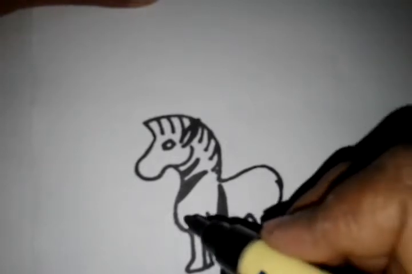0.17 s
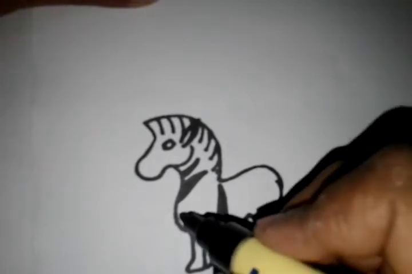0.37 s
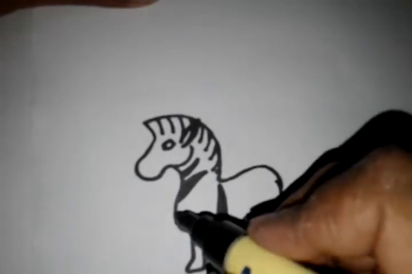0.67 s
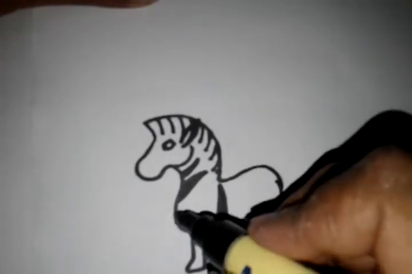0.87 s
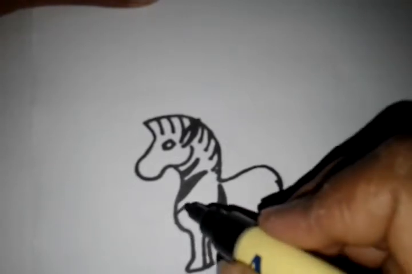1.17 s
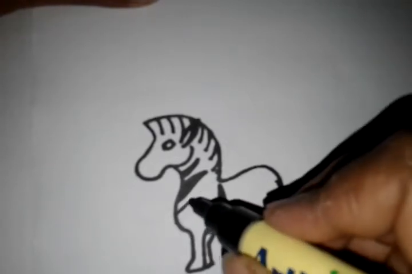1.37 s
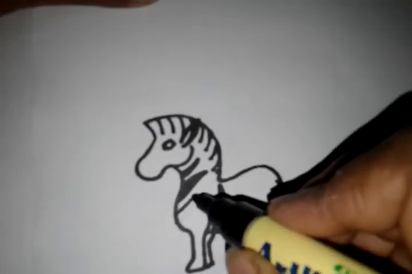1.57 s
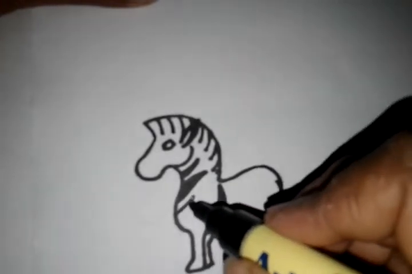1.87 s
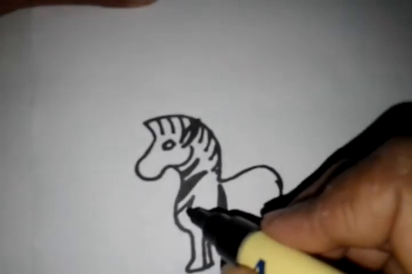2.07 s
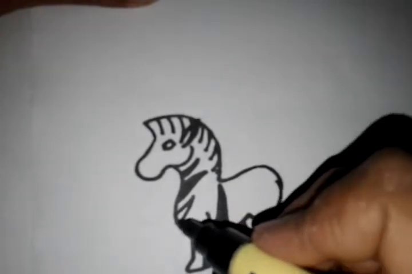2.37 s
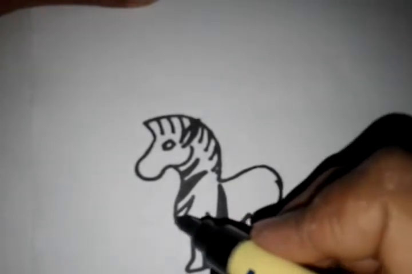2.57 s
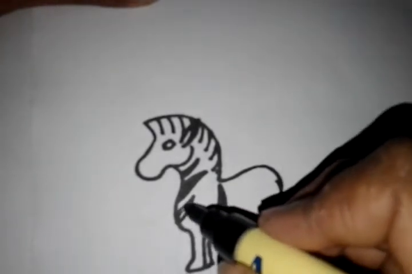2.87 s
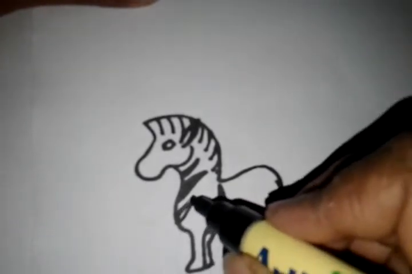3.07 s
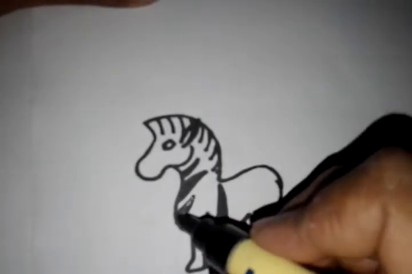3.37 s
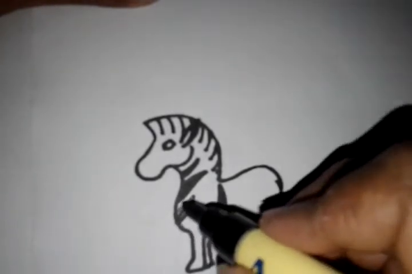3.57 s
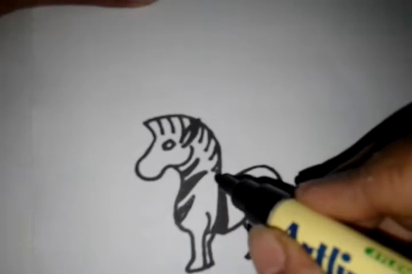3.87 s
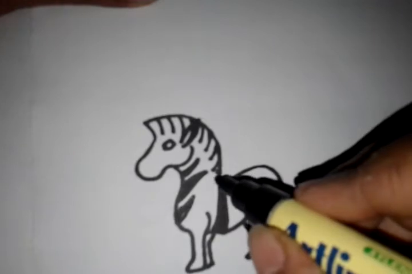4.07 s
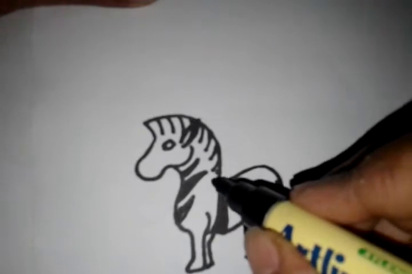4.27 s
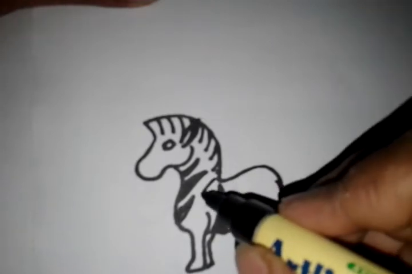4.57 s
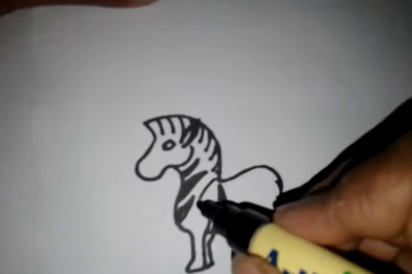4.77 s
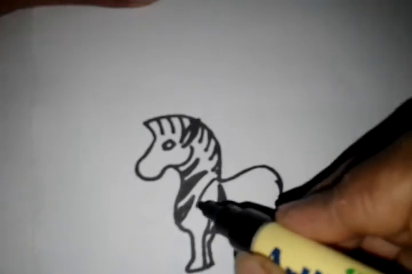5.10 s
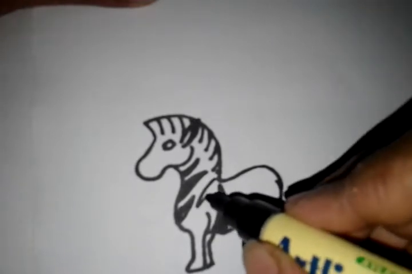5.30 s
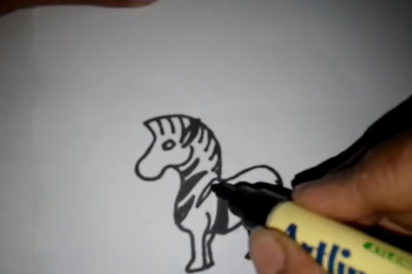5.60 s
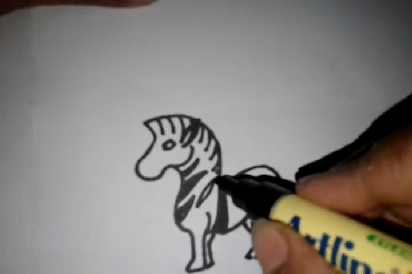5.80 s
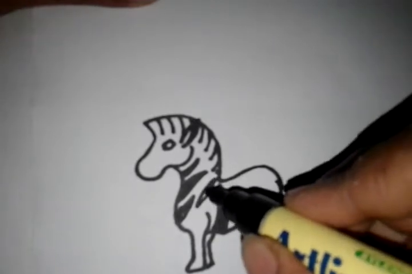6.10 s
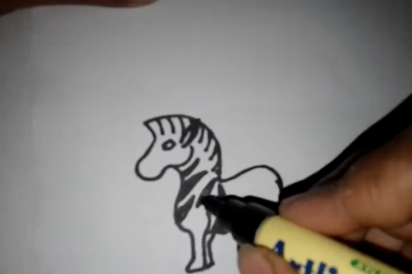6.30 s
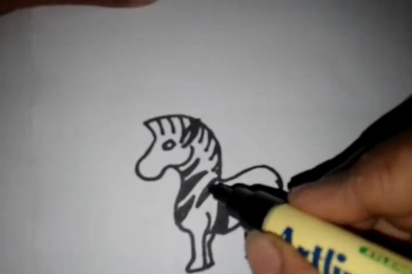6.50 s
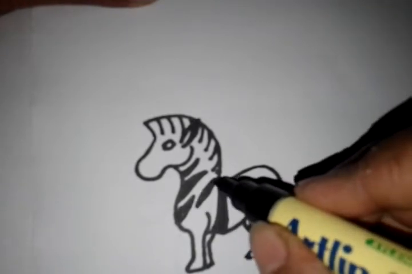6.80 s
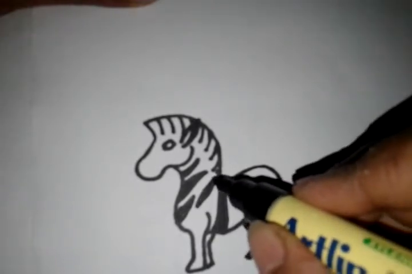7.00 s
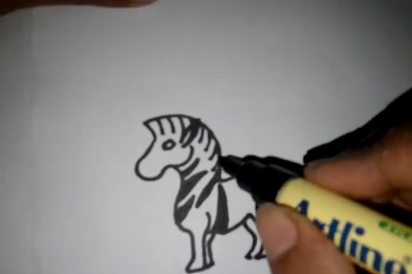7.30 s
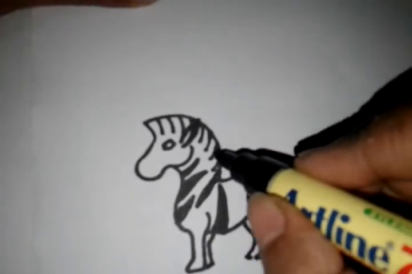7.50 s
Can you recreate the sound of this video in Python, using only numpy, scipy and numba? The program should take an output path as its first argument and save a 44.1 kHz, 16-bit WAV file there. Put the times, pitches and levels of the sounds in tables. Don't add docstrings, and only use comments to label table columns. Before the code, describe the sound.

Close dry marker strokes rasp and click on a sheet of paper, with short pauses, faint hand rustle, soft desk thuds and distant traffic.

```python
import sys
import numpy as np
from scipy import signal
from scipy.fft import rfft, irfft, next_fast_len
from scipy.io import wavfile
from numba import njit

SR = 44100
rng = np.random.default_rng(int(sys.argv[2]) if len(sys.argv) > 2 else 0)


def materialize(psi):
    bounded = np.clip(np.atleast_2d(psi).T, -1, 1)
    quanta = np.round(bounded * 32767).astype(np.int16)
    wavfile.write(sys.argv[1], SR, quanta)


def invert_db(x):
    u = np.asarray(x, float) / 20
    return 10 ** u


N = 337363
T = np.arange(N) / SR
NIB_TOP_HZ = 7800


def level(x, db):
    return x * invert_db(db) / np.sqrt(np.mean(x ** 2))


def walk(rate):
    knots = rng.standard_normal(4000)
    return 1.2 * np.interp(T * rate, np.arange(len(knots)), knots)


def over_time(rows):
    return np.interp(T, *np.transpose(rows))


def swell_between(start_s, end_s, ramp_s):
    return np.clip(np.minimum(T - start_s, end_s - T) / ramp_s, 0, 1)


def coloured(points):
    hz, db = np.transpose(points)
    size = next_fast_len(N)
    f = np.arange(size // 2 + 1) * SR / size + 1
    gain = invert_db(np.interp(np.log(f), np.log(hz), db))
    return level(irfft(rfft(rng.standard_normal(size)) * gain, size)[:N], 0)


@njit
def resonator(x, g, stretch, damping):
    y, band, low = np.empty(len(x)), 0., 0.
    for i in range(len(x)):
        h = g * stretch[i]
        v = (band + h * (x[i] - low)) / (1 + h * (h + damping))
        band, low = 2 * v - band, low + 2 * h * v
        y[i] = damping * v
    return y


def ring(x, modes, grip=np.ones(N), waver_db=0):
    out = 0
    for hz, width_hz, db, polarity in modes:
        g, damping = np.tan(np.pi * hz / SR), width_hz / hz
        stretch = 1 + (grip - 1) * (hz / NIB_TOP_HZ) ** 0.62
        waver = 1 + waver_db * np.log(10) / 20 * walk(7) if waver_db else 1
        once = resonator(x, g, stretch, damping)
        out = out + polarity * invert_db(db) * waver * resonator(once, g, stretch, damping)
    return out


# (fastest moment [s], scratch level [dB], rise [s], fall [s])
NIB_SWEEPS = [(.94, -37, 0.018, 0.083), (1.086, -40, 0.014, 0.012), (1.138, -36.5, 0.058, 0.046),
              (1.26, -44.5, 0.032, 0.027), (1.346, -38, 0.11, 0.048), (1.448, -35, 0.004, 0.019),
              (1.548, -39.5, 0.1, 0.032), (1.761, -32.5, 0.021, 0.093), (1.89, -37, 0.029, .08),
              (1.962, -41, .07, 0.042), (2.045, -39, .02, 0.21), (2.13, -44, 0.075, 0.027),
              (2.244, -37.5, 0.086, .06), (2.362, -38.5, 0.07, 0.056), (2.415, -42.5, 0.074, 0.015),
              (2.54, -38, 0.032, 0.058), (2.67, -52, 0.044, .05), (2.745, -33.5, 0.014, .05),
              (2.796, -28.5, 0.04, 0.083), (2.9, -29, 0.037, .09), (3.027, -38, 0.043, 0.031),
              (3.148, -33, 0.0076, .05), (3.208, -31.5, 0.044, 0.1), (3.292, -31, 0.14, 0.046),
              (3.44, -40, 0.016, 0.045), (3.558, -34.5, 0.11, 0.019),
              (4.18, -45.5, .005, 0.078), (4.264, -36.5, .03, 0.024), (4.392, -35.5, 0.084, 0.061),
                   (4.46, -31, 0.076, 0.044), (4.572, -36, 0.044, 0.16), (4.694, -36, 0.13, 0.019),
                   (4.792, -36, 0.083, .02), (4.894, -41.5, 0.088, 0.017), (5.106, -34, 0.032, .07),
                   (5.205, -37, 0.02, 0.25), (5.345, -32, 0.17, .05), (5.4, -42, .04, 0.083),
                   (5.448, -36, 0.0055, 0.02), (5.487, -34.5, 0.014, 0.066), (5.55, -35, 0.056, 0.051),
                   (5.654, -22.5, 0.0085, 0.009), (5.68, -27, 0.0082, 0.034), (5.703, -29.5, .004, .02),
                   (5.735, -34.5, .03, 0.026), (5.806, -36.5, 0.04, .016),
              (5.924, -33.5, 0.012, 0.011), (6.034, -34.5, .12, .1), (6.142, -31, 0.13, .06),
                  (6.19, -32.5, 0.045, 0.049), (6.374, -28, .009, 0.029), (6.426, -25, 0.048, 0.047),
                  (6.5, -34, 0.055, 0.15), (6.588, -40.5, 0.065, 0.026), (6.66, -42.5, .07, .05),
                  (6.788, -42, .005, 0.16), (6.88, -36.5, 0.02, 0.063), (7.02, -30.5, 0.018, .07),
                  (7.086, -30.5, 0.082, 0.03)]
# (time [s], top nib mode [Hz], sheet level [dB], barrel level [dB])
GRIP = [(.95, 7950, 3, -0.7), (1.55, 7720, 1.1, 1), (2.1, 7860, .3, 0.3), (2.4, 7814, 3.3, -0.8),
        (2.6, 8010, -1.5, -0.7), (3.02, 7900, -0.8, 0.9), (3.35, 8000, 0.3, -1.9), (3.5, 7940, -3.5, -.3),
        (4.25, 7640, -0.3, -0.1), (4.7, 7770, -1.4, 0.75), (5.12, 7770, 3.5, -0.3), (5.5, 7540, -1, 0.4),
        (5.75, 7550, -3, 1.3), (5.93, 7570, 1, 0.8), (6.4, 7700, -3, -0.2), (6.6, 7580, 1.3, -0.8),
        (6.85, 7700, 4.5, -2.2), (7.05, 7570, -3.7, 0.5)]


def strokes():
    power = np.full(N, 1e-10)
    for s, db, rise_s, fall_s in NIB_SWEEPS:
        near = slice(int((s - 5 * rise_s) * SR), int((s + 5 * fall_s) * SR))
        early = np.maximum(s - T[near], 0) / rise_s
        late = np.maximum(T[near] - s, 0) / fall_s
        drop_db = 10 * (early ** 2.93 + late ** 1.88)
        power[near] += invert_db(2 * (db - drop_db))
    scratch_db = 10 * np.log10(power)
    s, top_hz, lean_db, free_db = np.transpose(GRIP)
    effort_db = np.clip(scratch_db + 35, -22, 15)
    sheet_db = -12.5 - 0.1 * effort_db + np.interp(T, s, lean_db)
    barrel_db = -3 - 0.01 * effort_db + np.interp(T, s, free_db)
    return scratch_db, sheet_db, barrel_db, np.interp(T, s, top_hz) / NIB_TOP_HZ


# (time [s], peak level [dB])
SNAGS = [(1.4467, -14), (1.753, -25), (1.8741, -23), (2.0333, -4), (2.1725, -25), (2.3076, -23),
         (2.3552, -16), (2.5085, -20), (2.536, -13.5), (2.7407, -23), (2.9627, -28), (3.1433, -17),
         (3.433, -12), (4.177, -27), (4.2467, -26), (5.0994, -23), (5.1203, -7), (5.3114, -25),
         (5.442, -8.5), (5.6504, -15), (5.678, -10), (5.704, -7), (5.8026, -10), (6.0184, -7.5),
         (6.3708, -9.5), (6.784, -31), (7.012, -12), (7.0214, -11)]


def snag_bursts():
    size, decay_ms = 1300, 0.3
    out, t_ms = np.zeros(N), np.arange(size) / SR * 1000
    for s, db in SNAGS:
        grit = np.sign(rng.standard_normal(size))
        start = int(s * SR)
        out[start:start + size] += grit * np.exp(-t_ms / decay_ms) * invert_db(db - 6)
    return out


# (frequency [Hz], width [Hz], level [dB], polarity [gain])
PEN_MODES = [(4000, 205, -12.5, 0.71), (4954, 370, -7, 0.89), (5698, 600, -3.5, 0.82),
             (6160, 500, -3.5, -0.64), (7190, 1550, -7.5, -0.71), (7818, 506, 0, 0.85),
             (8360, 560, -7, -0.89), (8910, 580, -4, -0.9), (9730, 320, -8.5, -0.88),
             (10510, 840, -14.5, 0.87), (11260, 440, -21, -0.88), (11830, 1000, -18, 0.65),
             (13100, 900, -26, -1.2), (14400, 4100, -25.5, -1.03)]
# (frequency [Hz], width [Hz], level [dB], polarity [gain])
SHEET_MODES = [(415, 480, -4, 0.89), (1333, 476, -3.5, 0.9), (2150, 690, -4, 0.72), (2670, 170, -6, -0.87),
               (2953, 450, -1, 0.91), (3394, 104, -14, -0.66)]


def marker():
    scratch_db, sheet_db, barrel_db, grip = strokes()
    bunches_db = 0.62 * walk(30) + 1.2 * walk(100) + 1.1 * walk(350)
    slips = rng.standard_normal(N)
    strength_db = 2.2 * rng.exponential(size=N) + bunches_db
    drive = level(slips * invert_db(strength_db), 0) * invert_db(scratch_db)
    snags = snag_bursts()
    nib_share = np.sqrt(np.clip(1 - invert_db(2 * barrel_db), .15, 1))
    barrel_drive = drive * invert_db(barrel_db) + snags * invert_db(-4.5)
    nib_drive = drive * nib_share + snags * invert_db(-2.5)
    sheet_drive = drive * invert_db(sheet_db) + snags * invert_db(-21)
    barrel = invert_db(17) * ring(barrel_drive, PEN_MODES[:4], grip, waver_db=2.9)
    nib = invert_db(15.5) * ring(nib_drive, PEN_MODES[4:], grip, waver_db=0.8)
    sheet = invert_db(16) * ring(sheet_drive, SHEET_MODES, grip, waver_db=1.5)
    contact_click = ring(snags, [(7400, 7000, -5, 1)])
    return barrel + nib + sheet + contact_click


def reflections(source):
    size, t60_s = 6600, 0.063
    echoes = rng.standard_normal(size) * np.exp(-np.log(1000) * np.arange(size) / SR / t60_s)
    return signal.oaconvolve(source, echoes / np.sqrt(np.sum(echoes ** 2)))[:N]


# (time [s], level [dB])
HAND_LEVEL = [(0, -41.5), (.09, -40), (.15, -49), (.4, -52.5), (.9, -49.5), (1.7, -53.5), (3.62, -50),
              (3.7, -50.5), (3.9, -52.5), (4.16, -52.5), (5, -52.5), (5.87, -51.5), (6.3, -54), (7.16, -57),
              (7.29, -54.5), (7.41, -44), (7.52, -55.5), (7.65, -53.5)]
# (frequency [Hz], width [Hz], level [dB], polarity [gain])
HAND_TONE = [(2300, 810, -4, 1), (5350, 1500, -8.5, 1), (7200, 3650, 12.5, 0.48), (8560, 790, -25, -0.84),
             (11500, 2000, -5.5, 1)]
# (start [s], end [s], frequency [Hz], width
# [Hz], level [dB])
WISPS = [
    (.13, .3, 8800, 900, -56),
    (.2, .48, 8480, 300, -62),
    (5.82, 5.91, 8700, 900, -56),
    (3.68, 3.84, 7450, 600, -58),
    (2.58, 2.72, 8800, 1200, -56),
    (5.08, 5.62, 2500, 200, -60),
]


def hand():
    rub = rng.standard_normal(N) * invert_db(1.2 * walk(21))
    out = level(ring(rub, HAND_TONE), 0) * invert_db(over_time(HAND_LEVEL))
    for start_s, end_s, hz, width_hz, db in WISPS:
        glide = np.interp(T, [start_s, end_s], [1, 1 - 0.1 * (end_s - start_s)])
        wisp = level(ring(rub, [(hz, width_hz, 0, 1)], glide), db)
        out = out + swell_between(start_s, end_s, 0.028) * wisp
    return out


# (time [s], peak level [dB], frequency [Hz])
BUMPS = [
    (2.489, -39, 164),
    (3.418, -31.5, 168),
    (3.742, -34.5, 223),
    (3.83, -35, 159),
    (4.224, -42, 215),
    (4.876, -40, 199),
    (7.283, -34, 213),
    (7.566, -36, 167),
]


def desk():
    size, t60_s, rise_s = 6600, 0.055, 0.002
    out, t = np.zeros(N), T[:size]
    for s, db, hz in BUMPS:
        envelope = invert_db(db - 60 * t / t60_s) * (1 - np.exp(-t / rise_s))
        thud = envelope * np.sin(2 * np.pi * hz * t)
        start = int(s * SR)
        out[start:][:size] += thud[:N - start]
    return out


# (time [s], firing rate [Hz], level of the 4th multiple [dB])
ENGINE_COURSE = [
    (0.0, 54.47, -45),
    (0.93, 54.94, -42),
    (1.76, 56.6, -49),
    (1.87, 56.76, -54.5),
    (2.03, 56.63, -51.5),
    (2.21, 52.34, -54),
    (2.77, 49.5, -57.5),
    (2.87, 46.6, -55.5),
    (3.1, 48, -65),
]
# (multiple [1], level [dB])
ENGINE_HARMONICS = [(1, -33), (2, -10.5), (3, 0), (4, 3), (5, -10.5), (6, -16.5), (7, -31), (8, -21.5),
                    (9, -19.5)]


def engine():
    s, hz, db = np.transpose(ENGINE_COURSE)
    rate_hz = np.interp(T, s, hz) * (1 + 0.0023 * walk(11.9))
    phase = 2 * np.pi * np.cumsum(rate_hz) / SR
    tones = 0
    for multiple, harmonic_db in ENGINE_HARMONICS:
        loudness = invert_db(harmonic_db + 0.81 * walk(3.95))
        tones = tones + loudness * np.sin(multiple * phase + 6 * rng.random())
    fade_out = np.clip((s[-1] - T) / .2, 0, 1)
    return invert_db(np.interp(T, s, db) + 2.5) * tones * fade_out


# (time [s], level [dB])
TRAFFIC_LEVEL = [(0, -44.5), (.3, -46.5), (1.2, -45.5), (2.5, -47), (3.2, -50.5), (3.55, -48.5),
                 (3.95, -53.5), (4.3, -46), (4.6, -47.5), (5, -50), (5.7, -47), (6.3, -49.5), (6.5, -47.5),
                 (7, -46.5), (7.25, -49.5), (7.4, -45.5), (7.65, -50)]
# (frequency [Hz], level [dB])
TRAFFIC_TONE = [(20, -56), (36, -46), (65, -2.5), (110, -16), (160, 1.5), (230, -4), (300, -5.5),
                (480, -14.5), (600, -20), (1000, -20), (2200, -22.5), (4000, -29.5), (8000, -32.5)]


def traffic():
    return coloured(TRAFFIC_TONE) * invert_db(over_time(TRAFFIC_LEVEL) + 1.6 * walk(12))


# (start [s], end [s], frequency [Hz], level [dB])
DRONES = [(4.05, 5.0, 228, -53), (5.3, 6.8, 153, -54), (5.1, 5.8, 203, -52), (6.4, 9, 213, -53),
          (3.85, 4.12, 72, -55), (4.38, 4.65, 66, -56), (5.2, 5.55, 58, -58), (3.5, 3.9, 226, -54.5),
          (6.7, 6.95, 470, -56), (4.9, 6.5, 415, -58.5), (6.9, 8.4, 425, -60), (4.6, 5.7, 252, -58)]


def drones():
    out = np.zeros(N)
    for start_s, end_s, hz, db in DRONES:
        loudness = swell_between(start_s, end_s, 0.04) * invert_db(db + 1.5 * walk(7.7))
        phase = 2 * np.pi * np.cumsum(hz * (1 + .006 * walk(4.5))) / SR
        out = out + loudness * np.sin(phase)
    return out


# (frequency [Hz], width [Hz], level at the start [dB], level at the end [dB])
INSECT_BANDS = [
    (3280, 90, -65.5, -71),
    (5050, 400, -65, -64),
    (6540, 160, -62, -74),
    (2240, 240, -65, -66),
]


def insects():
    out, chorus = np.zeros(N), rng.standard_normal(N)
    for hz, width_hz, first_db, last_db in INSECT_BANDS:
        loudness_db = np.linspace(first_db, last_db, N) + 1.5 * walk(3) + 1.8 * walk(11)
        out = out + level(ring(chorus, [(hz, width_hz, 0, 1)]), 0) * invert_db(loudness_db)
    return out


# (frequency [Hz], level [dB])
HISS_TONE = [(400, 7.2), (1000, 3.2), (1700, 2.2), (2200, 1.7), (2800, 0.37), (4000, .5), (10000, 1.2),
             (16000, 1.5)]


def hiss():
    return invert_db(-53.5) * coloured(HISS_TONE)


def scene():
    pen = marker()
    near = pen + invert_db(-12.5) * reflections(pen) + hand() + desk()
    outside = engine() + traffic() + drones() + insects()
    mono = near + outside + hiss()
    return np.array([mono, mono])


def top_cut(x):
    return signal.sosfilt(signal.butter(12, 16650, fs=SR, output="sos"), x)


def record(dry):
    low_pass = signal.ellip(12, .2, 70, 15700, fs=SR, output="sos")
    mix = signal.sosfilt(low_pass, dry)
    return top_cut(mix)


dry = scene()
out = record(dry)
materialize(out)
```